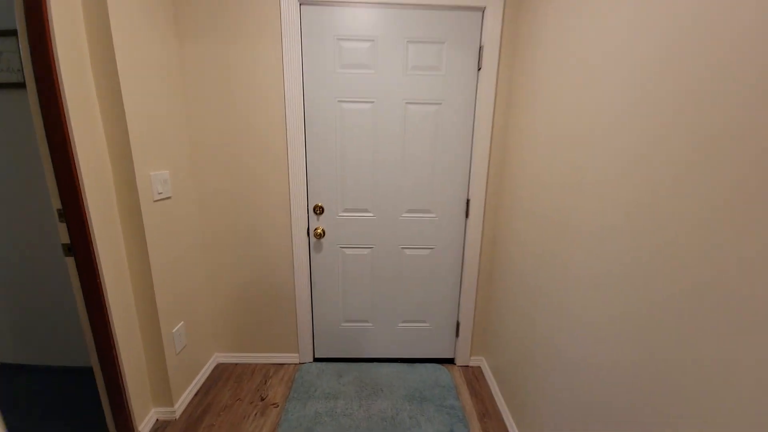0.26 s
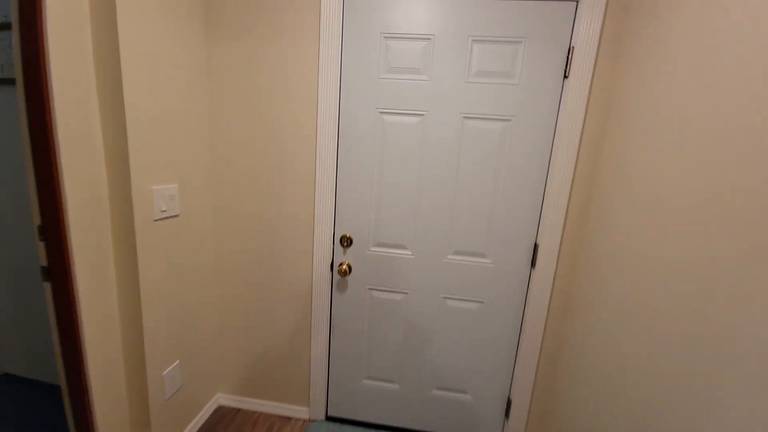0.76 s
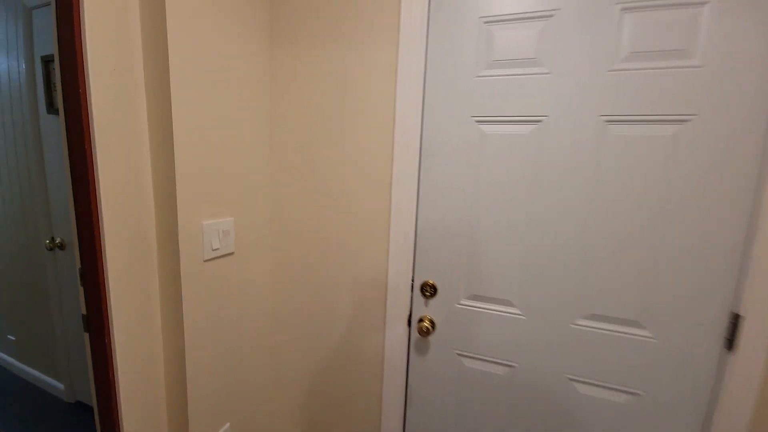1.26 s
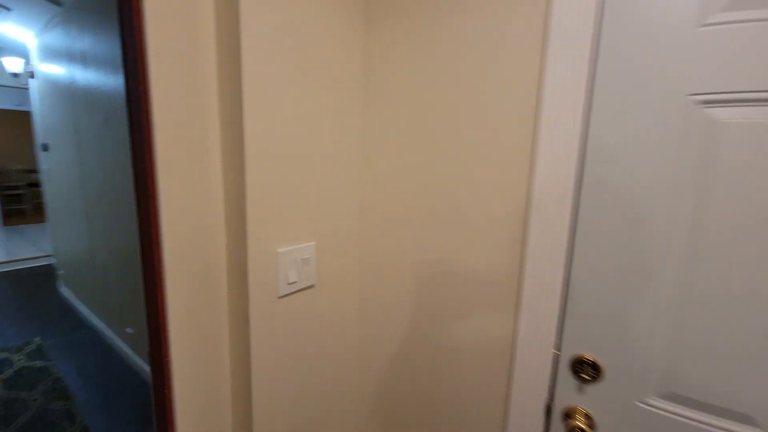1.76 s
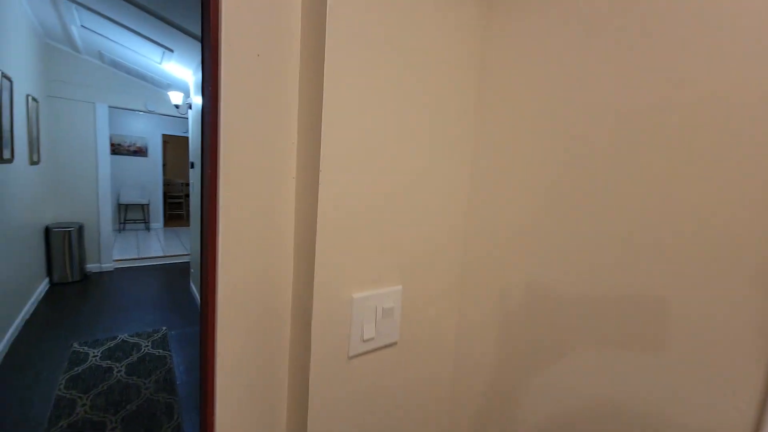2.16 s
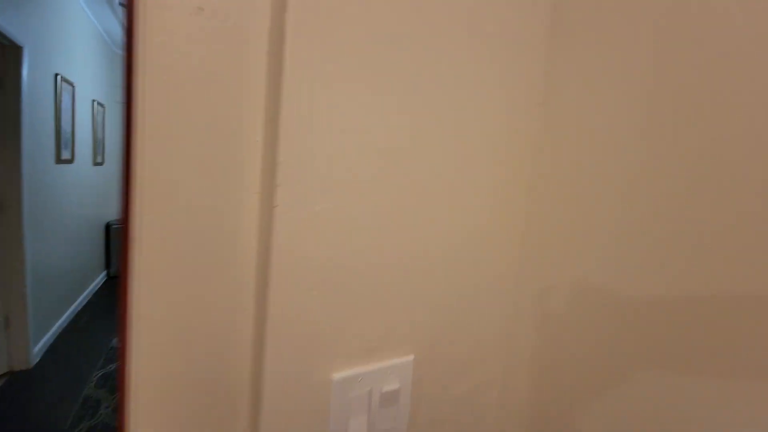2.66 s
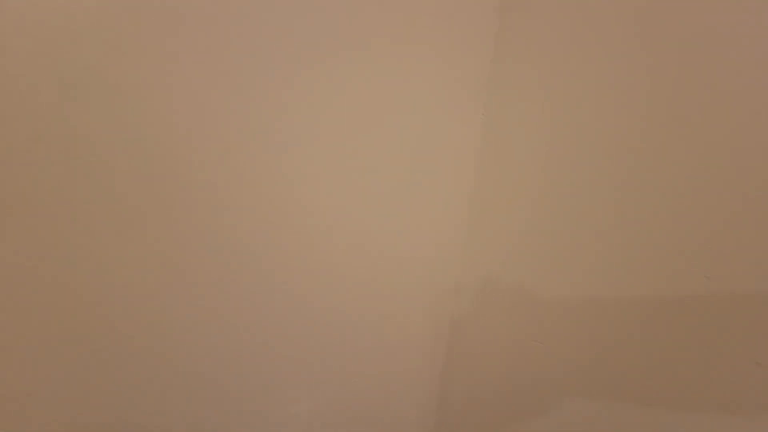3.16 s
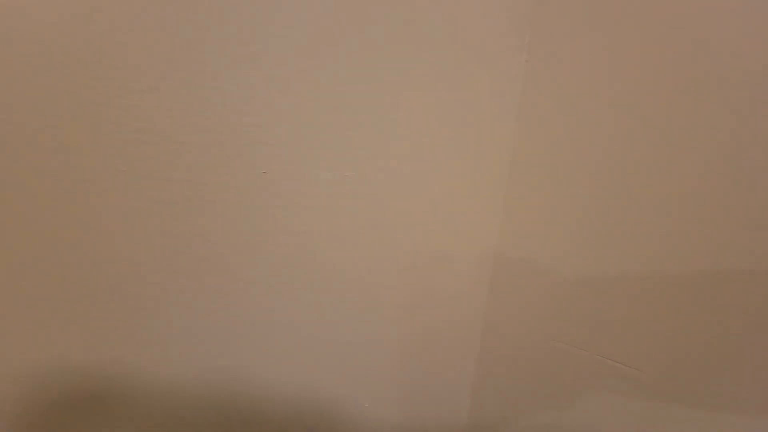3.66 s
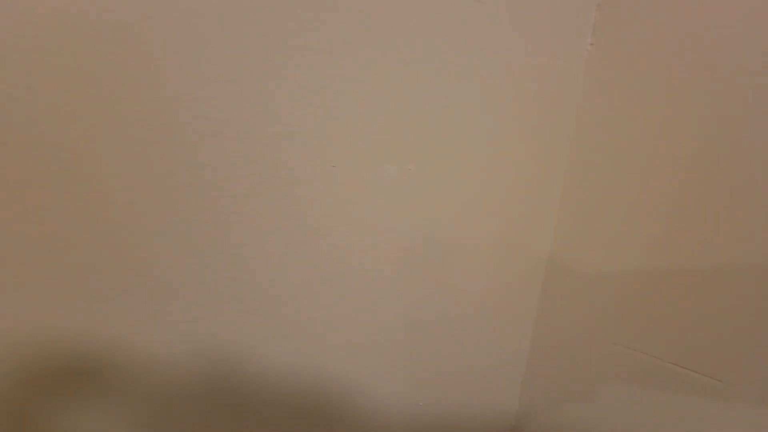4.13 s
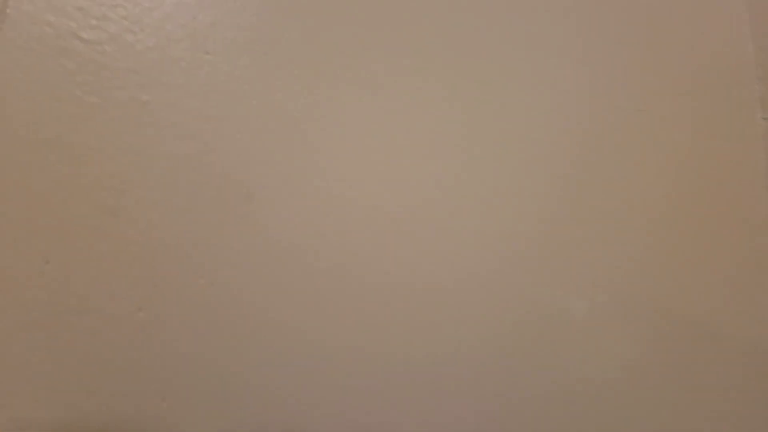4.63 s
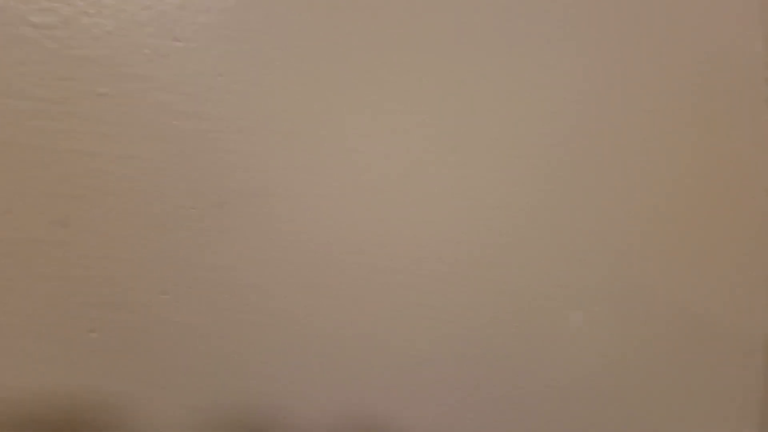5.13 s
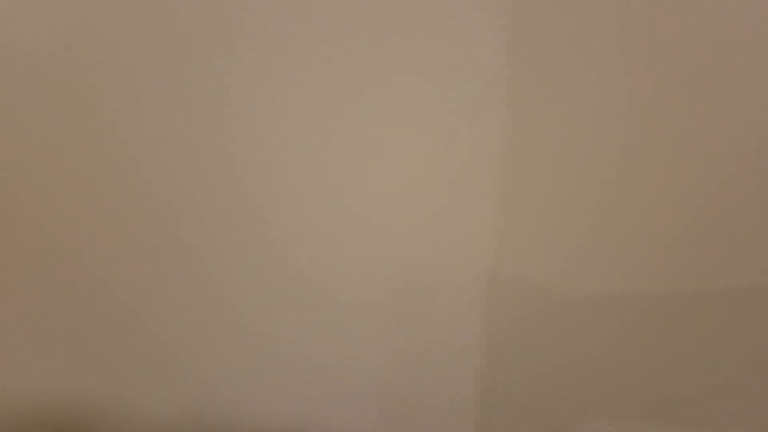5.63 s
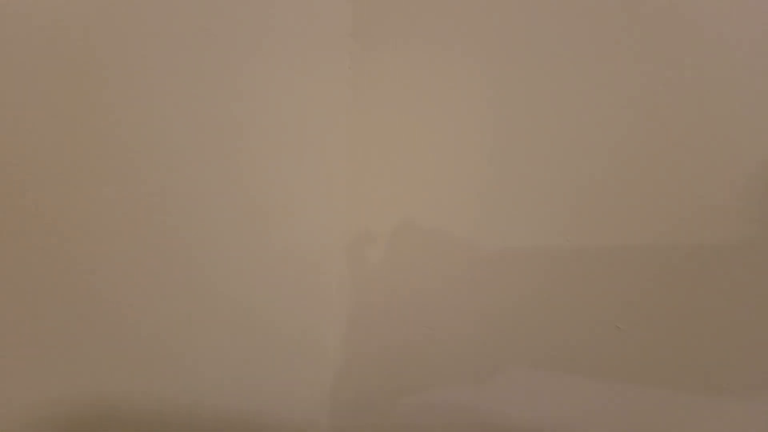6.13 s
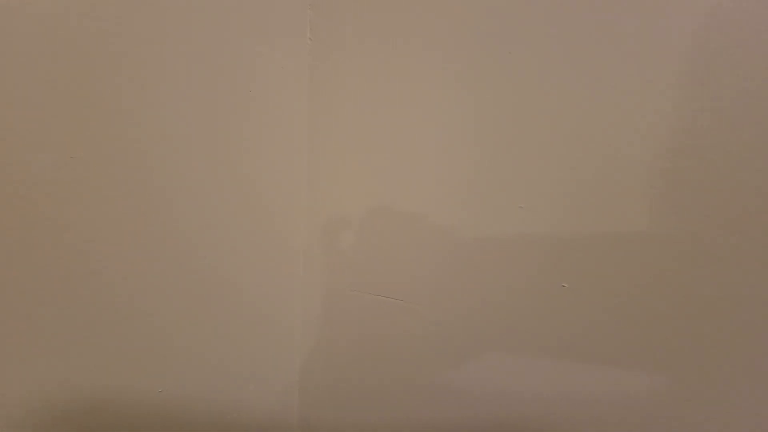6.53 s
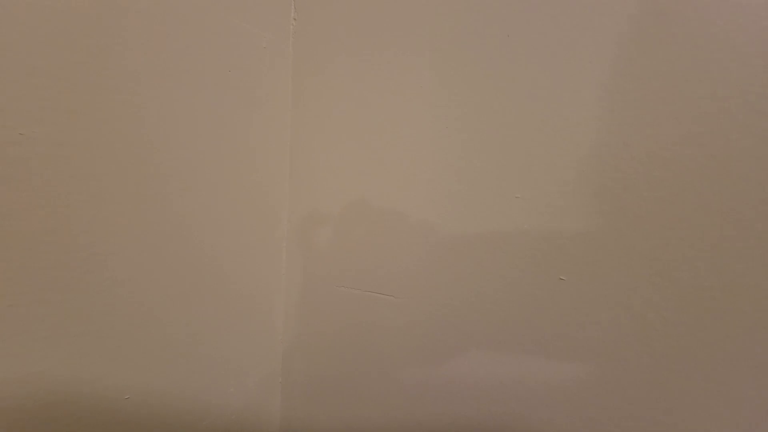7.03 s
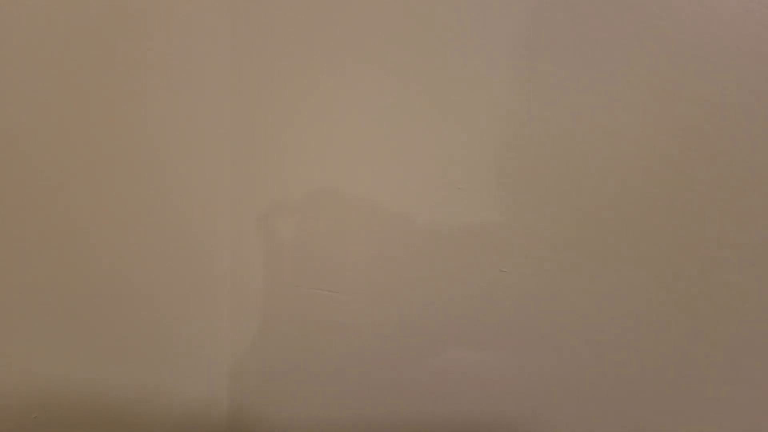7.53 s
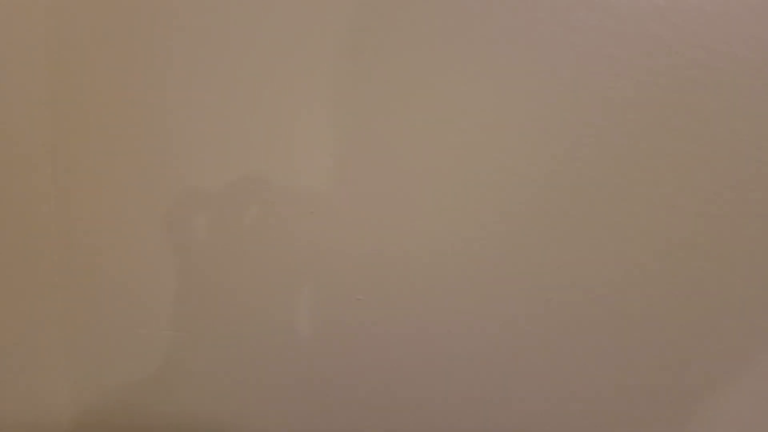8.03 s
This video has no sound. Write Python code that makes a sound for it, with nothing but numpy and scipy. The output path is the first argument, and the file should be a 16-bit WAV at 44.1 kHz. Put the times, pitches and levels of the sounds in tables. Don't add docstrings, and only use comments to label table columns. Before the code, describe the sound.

Someone walks over creaking boards, taps a hollow wall switch, works a metal lock and latch, and a hollow door slams with a low boom.

```python
import sys
import numpy as np
from scipy import signal
from scipy.fft import rfft, irfft
from scipy.io import wavfile

SR = 44100
rng = np.random.default_rng(int(sys.argv[2]) if len(sys.argv) > 2 else 0)


def convert_level_to_amplitude(level_db):
    exponent = np.asarray(level_db, float) / 20
    return 10 ** exponent


def generate_wav(sig):
    pcm = np.round(np.clip(np.atleast_2d(sig).T, -1, 1) * 32767).astype(np.int16)
    wavfile.write(sys.argv[1], SR, pcm)


N = 365588
MIC_GAP_M = 0.17


def at_hz(points, hz, axis=1):
    points = np.array(points)
    return np.interp(np.log(hz + 1), np.log(points[:, 0]), points[:, axis])


def band(x, low_hz, high_hz):
    return signal.sosfilt(signal.butter(2, [low_hz, min(high_hz, SR / 2.1)], "band", fs=SR, output="sos"), x)


def rms_one(x):
    return x / np.sqrt(np.mean(x ** 2) + 1e-20)


def add(out, s, sound, pan_db=0.):
    lag = 16 if s < 4.6 else -14
    for side, sign in enumerate((1, -1)):
        at = round(s * SR) + max(sign * lag, 0)
        heard = sound[side] if sound.ndim > 1 else sound
        out[side, at:at + len(heard)] += (convert_level_to_amplitude(sign * pan_db / 2) * heard)[:N - at]


def diffuse_pair(size):
    hz = np.fft.rfftfreq(size, 1 / SR)
    alike = np.sinc(2 * hz * MIC_GAP_M / 343)
    mid, side = rfft(rng.standard_normal((2, size)))
    return hz, np.sqrt(1 + alike) * mid + np.sqrt(1 - alike) * side * [[1], [-1]]


def near_pair(white, alike):
    alike = np.clip(alike, 0, 1)
    return np.sqrt(alike) * white[0] + np.sqrt(1 - alike) * white[1:]


def hiss():
    # (f/Hz, level/dB)
    hiss_colour = [(180, -2), (300, -7.5), (392, 0.5), (617, -7.5), (1830, -9), (2650, -14), (6670, -15),
                   (8160, -18), (14400, -14), (15700, -13.5), (16500, -41.5)]
    hz = np.fft.rfftfreq(N, 1 / SR)
    noise = rfft(rng.standard_normal((2, N))) * convert_level_to_amplitude(at_hz(hiss_colour, hz))
    return convert_level_to_amplitude(-72.5 + 2.0) * rms_one(irfft(noise, N))


def rumble():
    # (middle t/s, length t/s, level/dB, brightness dB per band)
    loads = [(0.007, 0.085, -61, -3), (0.489, 0.13, -56.5, -1), (0.64, 0.22, -53.5, 9),
             (0.816, 0.31, -71.5, -17), (1.353, 0.43, -69, 15), (2.083, 0.13, -64, 11.5),
             (2.204, 0.143, -73, -1), (2.265, .15, -83, -35), (2.82, 0.35, -54, -2),
             (3.119, 0.333, -63, 13.5), (3.551, 0.22, -54.5, -3.5), (3.798, 0.44, -49.5, -3),
             (5.04, 0.37, -55.5, 9), (5.797, 0.16, -55, -5), (6.202, 0.88, -59, -1.5),
             (6.483, 0.48, -53, 0.5), (6.676, 0.66, -65, -1.5), (7.186, 0.44, -49.5, 0),
             (7.348, 0.217, -52, -3), (7.635, 0.48, -48, .5), (7.93, 1, -58, 4.5)]
    rest_db = [-68, -81, -84]
    groan_db = [-6.5, 0, -9]
    edges_hz = [(30, 70.2), (70, 203.0), (200, 450)]
    drone_hz, drone_width_hz, drone_db = 109.7, 16, -72.5
    pair = irfft(diffuse_pair(N)[1], N)
    t = np.arange(0, N, 32) / SR
    power = convert_level_to_amplitude(np.array(rest_db))[:, None] ** 2 * np.ones(len(t))
    for s, length, db, bright_db in loads:
        swell = np.cos(np.pi * np.clip((t - s) / length, -.5, .5)) ** 2
        gains = convert_level_to_amplitude(db + np.array(groan_db) + bright_db * np.arange(-1, 2))
        power = power + (gains[:, None] * swell) ** 2
    out = np.zeros((2, N))
    for band_power, edge in zip(power, edges_hz):
        level = np.interp(np.arange(N) / SR, t, np.sqrt(band_power))
        out += level * rms_one(band(band(pair, *edge), *edge))
    drone = band(pair[:, ::-1], drone_hz - drone_width_hz / 2, drone_hz + drone_width_hz / 2)
    return out + convert_level_to_amplitude(drone_db) * rms_one(drone)


def hallway(layers):
    # (f/Hz, time to fall 60 dB t/s, level/dB)
    hall = [(40.5, 0.51, -6), (120.5, 0.57, -6), (300, 0.55, 3), (597, 0.55, -3), (1080, 0.67, -7),
            (1500, 0.63, -4.5), (2200, 0.59, -5.5), (4560, 0.53, -6), (7640, 0.35, 1.5), (13950, 0.42, -19)]
    echo_db = [-10, -15, 1.26, -2.5, 2.5, -9, -6.5, -7.5, -8.5, -8, -6, -8.5]
    sent = np.tensordot(convert_level_to_amplitude(np.array(echo_db)), layers, 1)
    hz, t, cells = signal.stft(irfft(diffuse_pair(2 ** 15)[1]), SR, nperseg=1024)
    cells *= convert_level_to_amplitude(at_hz(hall, hz, axis=2)[:, None] - 60 * t / at_hz(hall, hz)[:, None])
    tail = signal.istft(cells, SR, nperseg=1024)[1]
    tail *= convert_level_to_amplitude(-33.5) * (1 - np.exp(-np.arange(tail.shape[1]) / SR / 0.00043))
    return np.array([signal.fftconvolve(d, h)[:N] for d, h in zip(sent, tail)])


def shimmers():
    # (t/s, level/dB, centre f/Hz, width f/Hz, time to
    # fall 60 dB t/s)
    rough_rings = [(3.745, -40, 1620, 300, .5), (3.792, -40, 1550, 280, .75), (5.009, -30, 800, 110, .25),
                   (5.009, -46, 1950, 110, 0.7), (5.009, -47, 3340, 110, .65),
                   (5.01, -48, 13700, 2700, 0.26), (5.35, -72, 1330, 68, 1), (5.704, -49, 5500, 330, .6),
                   (5.703, -51, 4200, 450, .65), (5.704, -53, 3000, 480, 0.43),
                   (5.704, -54.5, 13000, 2000, 0.34), (6.393, -58, 5200, 190, 0.4),
                   (6.393, -47.5, 1114, 170, 0.52), (6.968, -63, 5370, 200, 0.25),
                   (6.968, -65, 4200, 900, 0.12), (7.104, -49, 1600, 600, .3),
                   (7.177, -46, 1700, 700, .25), (7.138, -61, 5000, 3500, .2), (8.09, -29, 77, 17, .6),
                   (8.091, -30, 525, 110, .25), (8.091, -50, 13000, 5000, .3),
                   (5.009, -27, 2000, 300, .07), (5.009, -48, 4030, 200, .4), (4.912, -59, 2100, 300, .25),
                   (7.454, -56, 4500, 700, .15), (7.455, -55, 2850, 300, .15), (7.57, -52, 2900, 300, .12),
                   (7.572, -54, 4400, 900, .15), (7.89, -59, 4200, 300, .2), (6.126, -57, 3300, 500, .15),
                   (3.745, -46, 920, 80, .2),
                   (5.03, -57, 7500, 3000, .8), (5.03, -50, 810, 100, .7), (5.704, -54, 7200, 1800, .3),
                   (5.677, -58, 2200, 3000, .15), (6.393, -55, 5800, 3000, .1), (7.2, -55, 1640, 160, .6),
                   (2.232, -50, 410, 90, .5), (2.245, -50, 800, 200, .4), (3.808, -36, 1600, 600, .1),
                   (3.85, -50, 1500, 400, .9), (2.81, -52, 480, 250, .4), (5.95, -62, 1100, 900, .2),
                   (8.092, -29, 1300, 800, .25), (6.392, -46, 1700, 900, .35), (6.393, -61, 5280, 100, .7),
                   (5.704, -57, 5500, 160, .85), (3.08, -56, 3300, 900, .5), (1.48, -70, 11500, 6000, .3),
                   (7.57, -50, 1300, 700, .2), (5.011, -36, 4500, 1500, .14), (1.5, -60, 2500, 1000, .8)]
    out, t = np.zeros((2, N)), np.arange(2 ** 15) / SR
    for s, db, hz, width_hz, t60 in rough_rings:
        white = near_pair(rng.standard_normal((3, len(t))), alike=np.exp(-hz / 1500.))
        noise = band(white, hz - width_hz / 2, hz + width_hz / 2)
        add(out, s, convert_level_to_amplitude(db - 60 * t / t60) * (1 - np.exp(-t / 0.0015)) * rms_one(noise))
    return out


def damped(hz, t60, rise_s, phase=0.):
    t = np.arange(int(t60 * SR) + 2) / SR
    return np.sin(2 * np.pi * hz * t + phase) * convert_level_to_amplitude(-60 * t / t60) * (1 - np.exp(-t / rise_s))


def single_tones(table, ring_s, shortening, rise_s, lift_db=0.):
    out = np.zeros((2, N))
    for s, db, hz, *pan_db in table:
        t60 = np.clip(ring_s * (100 / hz) ** shortening, .003, .6)
        add(out, s, convert_level_to_amplitude(db + lift_db) * damped(hz, t60, rise_s), *pan_db)
    return out


def ticks(table, colour_db, crack_s=0.0039, rattle=0.23, rattle_s=0.021):
    out, t = np.zeros((2, N)), np.arange(3000) / SR
    edges_hz = [(852.0, 2170), (400, 1390), (2200, 4030), (6600, 56000), (4200, 5800)]
    octaves = np.log2(np.sqrt(np.prod(edges_hz, axis=1)) / 1400)
    fade = np.exp(-t / crack_s) + rattle * np.exp(-t / rattle_s)
    for s, db, bright_db, pan_db in table:
        crack = near_pair(rng.standard_normal((3, 3000)), alike=0.074) * fade
        gains = convert_level_to_amplitude(db + 3 + np.array(colour_db) + bright_db * octaves)
        add(out, s, sum(gain * band(crack, *edge) for gain, edge in zip(gains, edges_hz)), pan_db)
    return out


def struck(modes, blows, rise_cycles, pan_db, detune):
    out = np.zeros((2, N))
    middle_hz = np.median(np.array(modes)[:, 0])
    for s, blow_db, bright_db in blows:
        for k, (hz, db, t60) in enumerate(modes):
            chance = rng.standard_normal((7, 4))
            sides = convert_level_to_amplitude(5.38 * min(hz / 900, 1) * chance[:, 2:])
            pitches = hz * (1 + detune * (np.linspace(-1, 1, 7) + chance[:, 0] / 5))
            bunch = [damped(pitch, t60, rise_cycles / hz, phase=turn * detune * 99)
                     for pitch, turn in zip(pitches, chance[:, 1])]
            gain = convert_level_to_amplitude(blow_db + db + bright_db * np.log2(hz / middle_hz) - 18.5)
            add(out, s, (-1) ** k * gain * sides.T @ np.array(bunch), pan_db)
    return out


def housing_knocks():
    # (t/s, peak level/dB, f/Hz, left-right level/dB)
    knocks = [(0.21, -41.5, 400, 12), (0.212, -47, 114.6, 10), (0.4707, -25.5, 419.3, 14.5),
              (0.511, -31, 450, .1), (0.531, -30.5, 440, 2), (0.555, -25, 440, 4), (0.606, -25, 454, 6),
              (0.6685, -19, 470, -8), (0.7, -43, 400, 4), (1.278, -37, 526, .1), (2.136, -32.5, 523, 1.9),
              (4.91, -48, 300, -2), (4.9125, -28.5, 2080, 2), (2.051, -44, 240, 1), (2.141, -33.5, 590, -1),
              (2.229, -40, 425, 1), (2.741, -42, 202, 2), (2.802, -40, 390, 1), (2.82, -42, 560, 1),
              (7.19, -36, 300, .1), (8.116, -12, 180, .1)]
    pips = [
        (0.6677, -28, 3300, -14),
        (0.668, -38, 7500, -6),
        (0.668, -43, 5000, -9),
        (0.6685, -35, 10500, -12),
        (0.592, -38, 2470, -3),
        (4.9125, -36, 2050, 2),
        (4.9125, -44, 3200, -3),
        (4.9125, -52, 6800, 1),
        (4.9125, -52, 8200, 1),
    ]
    dull = single_tones(knocks, ring_s=0.061, shortening=0.89, rise_s=0.00093)
    return dull + single_tones(pips, ring_s=0.007, shortening=0.05, rise_s=0.0002)


def housing_snaps():
    # (t/s, level/dB, brightness dB per octave, left-right level/dB)
    snaps = [
        (0.5094, -36, -0.5, -5),
        (0.5335, -58, 1, 7),
        (0.589, -35, 0.3, -5),
        (0.5934, -36, -2, -5),
        (0.605, -37, -2, -9.5),
        (0.6255, -31, -1.5, -11),
        (0.6684, -23.5, 0, -9.5),
        (0.70, -39, -10, 8),
    ]
    snap_db = [-29, 5, 0, -12.5, -22]
    return ticks(snaps, snap_db, crack_s=0.00043, rattle=0.036, rattle_s=0.0036)


def scuffs():
    # (t/s, length t/s, level/dB, centre f/Hz)
    slides = [(0.0, 0.072, -51, 1500), (0.613, 0.09, -47, 1650), (1.221, 0.47, -60.5, 1020),
              (1.365, 0.15, -42, 2100), (2.056, 0.3, -60.5, 1040), (2.218, 0.12, -53, 1100),
              (2.741, 0.11, -53, 6120), (2.75, 0.13, -54, 980), (3.049, 0.21, -63, 5300),
              (3.628, 0.24, -51, 2200), (4.25, .22, -63, 9000), (5.25, 0.14, -70, 8000),
              (7.06, 0.16, -52.5, 950), (7.591, 0.088, -45, 1500), (7.873, 0.15, -56.5, 1830),
              (8.041, 0.063, -50, 2400)]
    rubs = [
        (0.526, 0.074, -51, 1500),
        (1.371, 0.2, -52, 900),
        (2.21, 0.09, -53, 3000),
        (2.92, 0.16, -56, 1500),
        (3.027, 0.23, -41.5, 1500),
        (3.037, 0.2, -51.5, 514),
        (3.369, 0.51, -59, 1290),
        (4.358, 0.95, -73, 11260),
        (7.098, 0.1, -58, 1550),
    ]
    # (t/s, level/dB, centre f/Hz, spread in octaves, left-right level/dB)
    grazes = [(0.448, -60, 1500, 0.58, -0.5), (3.501, -48, 2000, 1.2, -1), (3.741, -36, 1200, 0.28, 3),
              (3.788, -33, 2000, 0.97, 0), (4.911, -58.5, 2100, 0.175, 12), (5.007, -41, 14700, 0.2, -1.5),
              (5.705, -47.5, 4100, 0.88, 12), (6.12, -67, 2440, 1.5, -5), (6.389, -45, 1130, 1.08, -0.5),
              (7.449, -60, 3750, 0.61, -1), (7.567, -52.5, 3560, 0.76, -2.5),
              (8.087, -23.5, 464, 0.45, -2.5), (8.088, -31.5, 2000, 1.37, -18), (8.095, -30, 2200, 1, 10)]
    strokes = [(*row, 1.32, -.3) for row in slides]
    strokes += [(*row, 0.71, .4) for row in rubs]
    strokes += [(s, 0.027, *rest) for s, *rest in grazes]
    out = np.zeros((2, N))
    for s, length, db, centre_hz, octaves, pan_db in strokes:
        size = 2 ** 15 if length > .04 else 2 ** 11
        hz, t = np.fft.rfftfreq(size, 1 / SR) + 1, np.arange(size) / SR
        roughness = np.minimum(rng.exponential(1, size // 64), 3).repeat(64)
        grains = near_pair(rng.standard_normal((3, size)), alike=0.38) * convert_level_to_amplitude(3.9 * roughness)
        octave = np.log2(hz / centre_hz) / octaves
        hump = convert_level_to_amplitude(-6 * np.where(octave > 0, 1.4, .8) * octave ** 2) / np.sqrt(hz)
        swell = np.sin(np.pi * np.clip(t / length, 0, 1) ** 0.46)
        add(out, s, convert_level_to_amplitude(db) * swell * rms_one(irfft(rfft(grains) * hump)), pan_db)
    return out


def heels():
    # (t/s, peak level/dB, f/Hz)
    landings = [(0.459, -32.5, 143.3), (0.535, -26, 114.5), (0.662, -36, 180), (0.77, -41, 123),
                (1.219, -30, 131), (1.25, -35, 62), (1.281, -33, 129), (1.409, -38, 170),
                (2.054, -26.5, 58.8), (2.12, -29, 57.6), (2.15, -22, 66.4), (2.356, -35.5, 54.3),
                (2.741, -30, 81), (2.795, -28, 63), (2.94, -43, 88.8), (3.504, -35.5, 143),
                (3.79, -30.5, 46.3)]
    return single_tones(landings, ring_s=0.086, shortening=1, rise_s=0.0066, lift_db=-0.5)


def wood_ticks():
    # (t/s, level/dB, brightness dB per octave, left-right level/dB)
    wood = [
        (0.4447, -46, -1, 5),
        (1.2134, -43, 1, 2),
        (2.0519, -41, 1, 1),
        (2.138, -46, -5, 2),
        (2.7422, -38.5, -0.5, 6),
        (2.9744, -33, 0.5, 1),
        (3.5044, -53, 5.5, 2),
        (4.9127, -45, 3, -1.5),
        (8.088, -16, 1.1, 3.5),
        (8.1015, -12.5, 2.5, -.5),
    ]
    wood_db = [-6, 2, -20, -29.5, -36.5]
    return ticks(wood, wood_db)


def panel_ticks():
    # (t/s, level/dB, brightness dB per octave, left-right level/dB)
    panel = [(1.2805, -43, -16, 3), (8.0955, -22.5, 2.5, 2), (3.0304, -33, -8, -3),
             (3.465, -38.5, -16.5, 5), (3.6313, -41.5, 1, 6), (3.6529, -29, -0.5, 0),
             (3.7443, -15.5, -2, 0.5), (3.7909, -13, 0, 0.5), (6.3924, -31.5, -5, 4),
             (7.1039, -36.5, -20, 2), (7.14, -71, 8.5, 2), (7.5945, -34, -2.5, -5), (8.0435, -47, 1.5, 3),
             (7.1766, -38, 2, .1)]
    panel_db = [-3.5, -22.5, -10, -18, -41]
    return ticks(panel, panel_db)


def metal_ticks():
    # (t/s, level/dB, brightness dB per octave, left-right level/dB)
    metal = [(5.009, -22.5, 1.5, -3), (5.7024, -30, -3, 1), (6.0367, -51.5, -2, 3), (6.1244, -45, -5, 4.5),
             (6.9696, -52, -7.5, 7), (7.0503, -37, 0.75, -2.5), (7.3798, -49.5, -1, -3),
             (5.0122, -26.5, 2, 1.8), (7.5687, -49, 1, 1), (7.6345, -30.5, -2, 1), (7.9103, -40.5, 0, 2)]
    metal_db = [-2, -5, -2.5, -11, -25]
    return ticks(metal, metal_db)


def chinks():
    # (t/s, peak level/dB, f/Hz, left-right level/dB)
    loose_parts = [(0.509, -38, 1900, -5), (2.141, -41, 1550, -4), (2.799, -40, 1700, .1),
                   (2.936, -44, 1480, 1), (2.943, -45, 1500, 1), (8.088, -17, 1100, 4),
                   (8.089, -20, 1600, 8), (8.1005, -20, 1500, .1), (8.103, -24, 2700, 2),
                   (0.6682, -31, 1600, -11), (3.793, -45, 2920, .1), (5.0105, -30, 8000, -3),
                   (5.0122, -19, 15100, -3), (5.012, -25, 6600, -3), (6.126, -48, 3180, .1),
                   (6.128, -51, 4170, .1), (6.392, -46, 3170, -3), (7.0503, -35.5, 6400, 3),
                   (7.0503, -40, 4000, -5), (7.0506, -35, 7500, 2), (7.104, -38, 2400, -2),
                   (7.177, -37, 8940, .1), (7.453, -47, 4500, .1), (7.4568, -45, 2720, 5),
                   (7.569, -43, 2900, .1), (7.574, -47, 4300, .1), (7.6357, -29, 2830, .1),
                   (7.6345, -35, 4970, 2), (7.889, -50, 4200, .1)]
    return single_tones(loose_parts, ring_s=0.0099, shortening=0.05, rise_s=0.00023)


def wall():
    # (f/Hz, level/dB, time to fall 60 dB t/s)
    modes = [(900, 1, 0.18), (1290, 1.1, 0.18), (1400, -2.1, 0.3), (1600, -8, 0.36), (1690, 3, 0.19)]
    # (t/s, level/dB, brightness dB per octave)
    blows = [
        (3.743, -29.5, .1),
        (3.79, -31, .1),
    ]
    return struck(modes, blows, rise_cycles=0.31, pan_db=4.5, detune=0.039)


def bolt():
    # (f/Hz, level/dB, time to fall 60 dB t/s)
    modes = [(244, -6, 0.33), (450, -7.5, 0.24), (771, 9, 0.066), (817, -5, 0.14), (1177, -1.5, 0.12),
             (1330, -31, 0.93), (1949, -8, 0.17), (2000, 8, 0.046), (3350, 2.7, 0.16), (4030, -14, 0.15),
             (7680, 0, 0.036)]
    # (t/s, level/dB, brightness dB per octave)
    blows = [
        (4.962, -56.5, -3),
        (5.008, -24.5, .1),
    ]
    return struck(modes, blows, rise_cycles=0.39, pan_db=3.5, detune=0.02)


def knob():
    # (f/Hz, level/dB, time to fall 60 dB t/s)
    modes = [(300, 2, 0.23), (464, -1, 0.109), (1257, -6.5, 0.16), (2850, -3, 0.15), (3410, -5, 0.21),
             (4180, -4, 0.2), (4780, -6, 0.19), (3800, -1.5, 0.17), (5460, -8, 0.27), (5500, 0, 0.12),
             (11900, -5, 0.092), (13400, -2, 0.068)]
    # (t/s, level/dB, brightness dB per octave)
    blows = [
        (5.704, -34.5, -0.6),
        (7.451, -59, 1),
        (7.57, -55.5, -3),
    ]
    return struck(modes, blows, rise_cycles=0.28, pan_db=-4.0, detune=.022)


def latch():
    # (f/Hz, level/dB, time to fall 60 dB t/s)
    modes = [(161, 11.5, 0.16), (273, 5, 0.21), (370, -4, 0.16), (830, -15, 0.17), (1130, -2, 0.23),
             (1580, -26, 0.1), (2100, -10, 0.17), (5200, -5, 0.15), (5480, -16, 0.15), (12100, -22.5, 0.18)]
    # (t/s, level/dB, brightness dB per octave)
    blows = [
        (6.391, -32.5, .1),
        (6.968, -60, .1),
    ]
    return struck(modes, blows, rise_cycles=0.38, pan_db=-1.0, detune=0.0199)


def pocket():
    # (f/Hz, level/dB, time to fall 60 dB t/s)
    modes = [(1420, -9, 0.098), (1710, -5, 0.1), (2150, -0.5, 0.1), (8600, -1.5, 0.0347)]
    # (t/s, level/dB, brightness dB per octave)
    blows = [
        (7.105, -47, -9),
        (7.177, -40, 0.5),
        (7.635, -38, 0.3),
    ]
    return struck(modes, blows, rise_cycles=0.27, pan_db=7.5, detune=0.042)


def door_bumps():
    # (t/s, peak level/dB, f/Hz)
    bumps = [(4.954, -39, 132), (5.6768, -30.5, 146), (5.683, -19.5, 97), (6.038, -43, 91),
             (6.392, -30, 126), (6.748, -43, 51.8), (7.063, -42, 170), (7.179, -35, 130), (7.301, -40, 125),
             (7.322, -34.5, 105), (7.378, -40, 70), (7.452, -31.5, 51.7), (7.452, -32.5, 103),
             (7.551, -33, 105), (7.627, -31.5, 102.8), (7.818, -42.5, 106), (7.897, -38, 80.6),
             (8.046, -47, 136), (8.088, -8, 31), (8.1, -20, 75)]
    return single_tones(bumps, ring_s=0.12, shortening=0.11, rise_s=0.0028)


def door_bang():
    # (f/Hz, level/dB, time to fall 60 dB t/s)
    modes = [(45.1, -2, 0.58), (63.3, -17, 0.6), (86.8, -1, 0.46), (109.5, -22, 0.9), (132, -14, 0.46),
             (154.4, -7, 0.2), (182, -14.5, 0.24), (211, -10, 0.18), (248.5, -17.5, 0.33),
             (322, -8.5, 0.052), (394, -25, 0.8), (525, -13, 0.067)]
    # (t/s, level/dB, brightness dB per octave)
    blows = [
        (5.677, -27.5, .1),
        (8.1135, -7, -1),
        (8.086, -5, 3.5),
        (8.0915, -10, .1),
        (8.102, -9, -3),
    ]
    return struck(modes, blows, rise_cycles=0.45, pan_db=-0.5, detune=0.0067)


def scene():
    layers = np.array([
        heels() + door_bumps(), housing_knocks(), wood_ticks() + panel_ticks() + metal_ticks(),
        housing_snaps(), scuffs(), bolt(), door_bang(), knob(), latch(), wall(), pocket(), chinks()])
    return layers.sum(axis=0) + hallway(layers) + rumble() + hiss() + shimmers()


def band_limit(x):
    return signal.sosfilt(signal.butter(12, 16820, fs=SR, output="sos"), x)


def record(dry):
    heard = signal.sosfilt(signal.butter(2, 24, "high", fs=SR, output="sos"), dry)
    rounded = 1.041 * np.tanh(heard / 0.91)
    top_cut = signal.cheby2(12, 60, 16000 * 1.05, fs=SR, output="sos")
    return band_limit(signal.sosfilt(top_cut, rounded))


dry = scene()
out = record(dry)
generate_wav(out)
```